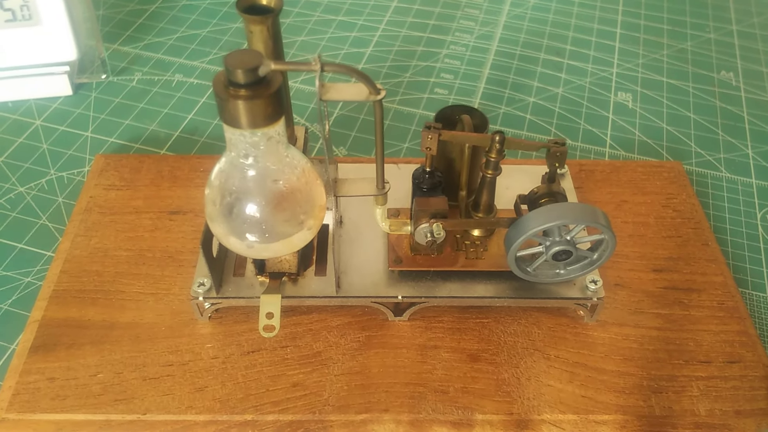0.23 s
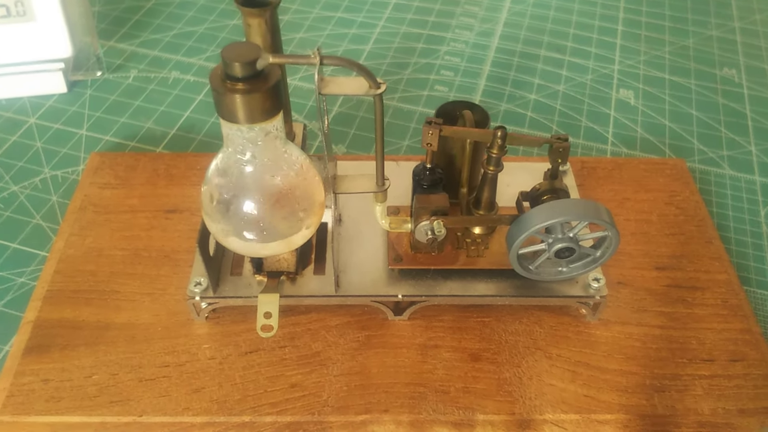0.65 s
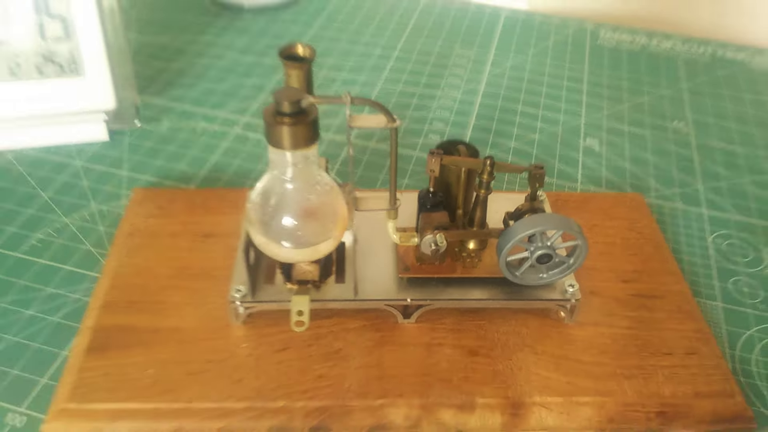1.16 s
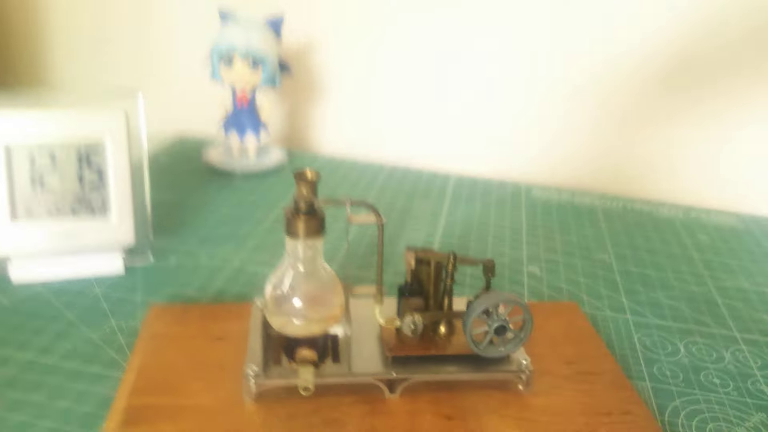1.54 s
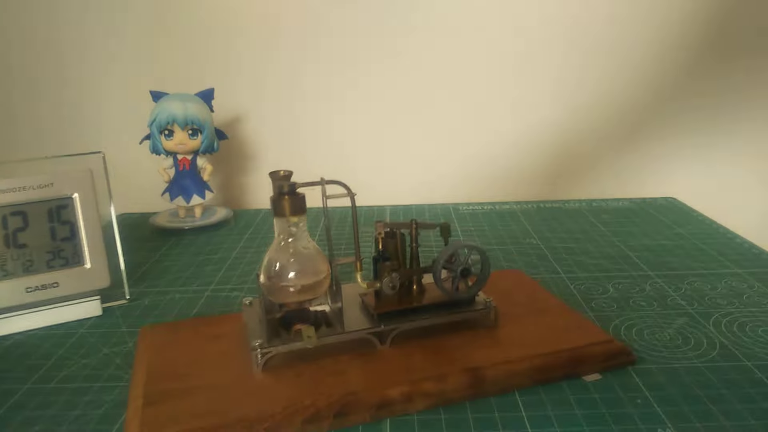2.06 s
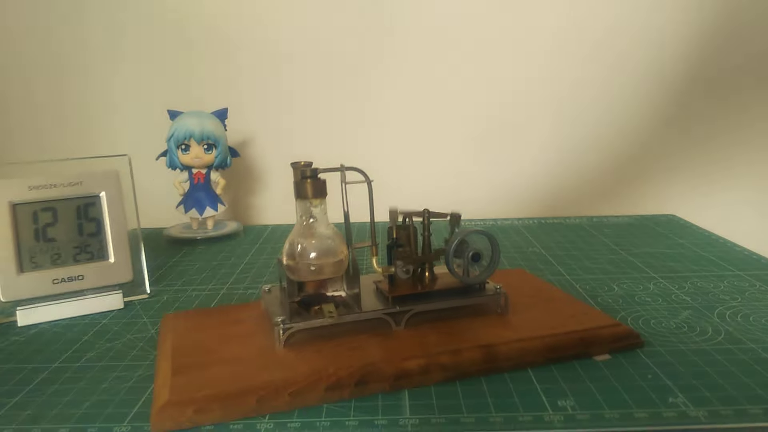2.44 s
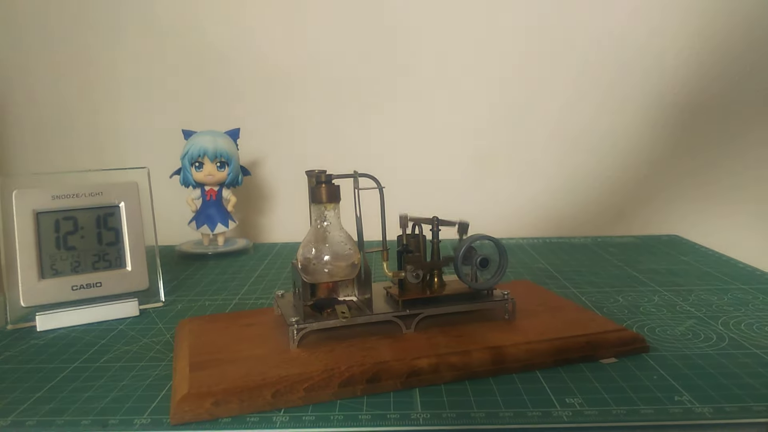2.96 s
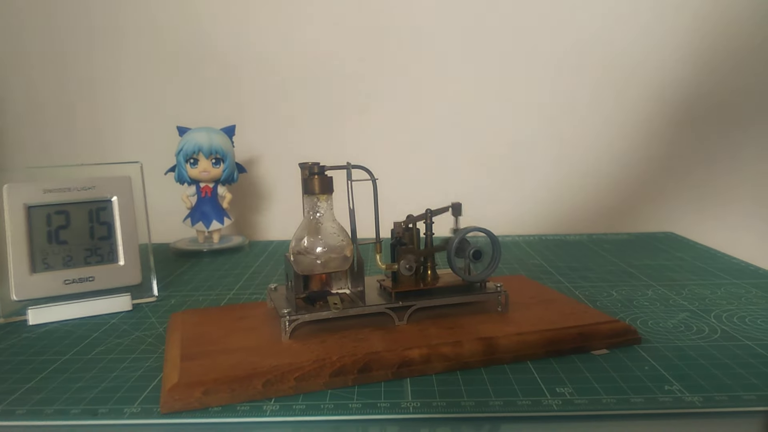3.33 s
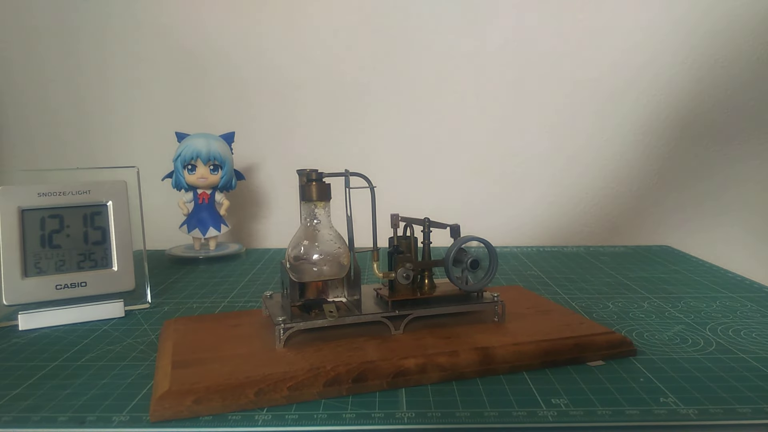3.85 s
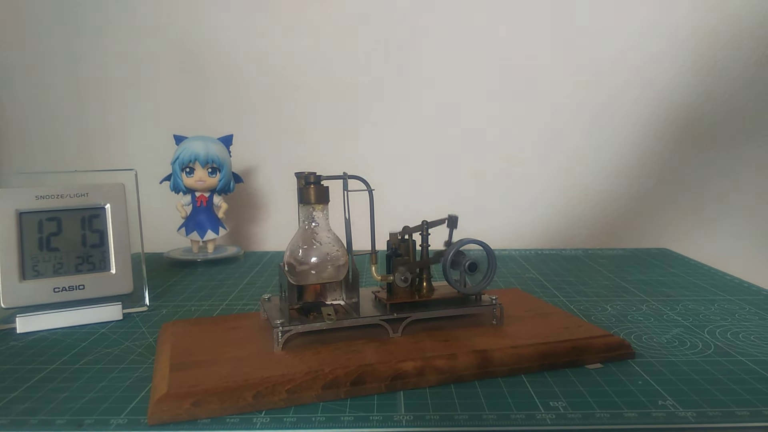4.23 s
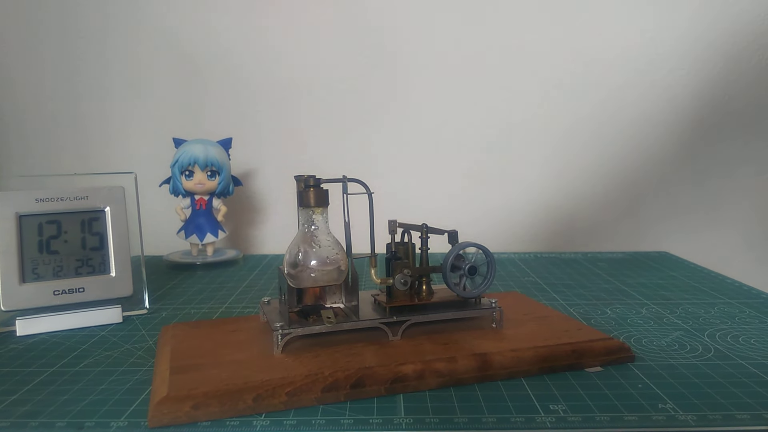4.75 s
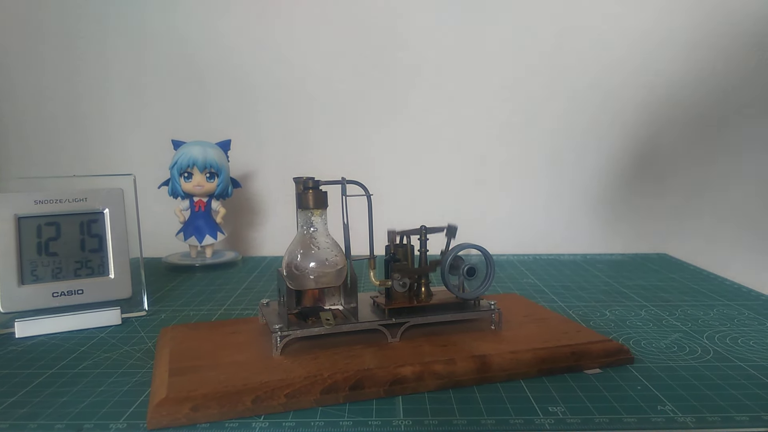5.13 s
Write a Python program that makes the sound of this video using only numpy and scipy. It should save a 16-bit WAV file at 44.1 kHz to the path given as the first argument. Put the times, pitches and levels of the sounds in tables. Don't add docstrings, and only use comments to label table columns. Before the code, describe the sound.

0-1.3 s: a quiet small room, only soft microphone hiss, low rumble and barely audible distant stirs, with one dry plastic click at 1.0 s. From 1.3 to 1.6 s, a cluster of faint creaks from the phone casing in the hand; from 1.67 to 2.1 s, harder snaps, the loudest at about 1.83 and 1.92 s. At 2.13 s a tiny steam engine starts close by, about seven or eight turns a second: sharp, bouncing metal ticks, gritty piston scrapes with a slight steamy hiss, and soft knocks into the wooden board. Loud rattles and rubbing mark 2.1-2.7 s, and metallic clanks peak around 3.1-3.3 s. From 3.4 to 4.0 s the ticking is softer and regular; sharper valve ticks return after 4.1 s, slowing slightly, with a longer gap near 4.8 s, continuing to the end around 5.4 s. Dry stereo, the right brighter in the upper mids, the left carrying finer treble.

```python
import sys
import numpy as np
from scipy import signal
from scipy.fft import rfft, irfft
from scipy.io import wavfile
from scipy.ndimage import uniform_filter1d

SR = 44100
rng = np.random.default_rng(int(sys.argv[2]) if len(sys.argv) > 2 else 0)


def wav_out(sig):
    wavfile.write(sys.argv[1], SR, np.round(np.clip(np.atleast_2d(sig).T, -1, 1) * 32767).astype(np.int16))


def attenuation_scalar(level_db):
    decades = np.asarray(level_db, float) / 20
    return 10 ** decades


N = 237566

VALVE, POWER, RETURN = range(1, 4)
# valve_snap_s, valve_db, power_stroke_db, return_stroke_db, piston_return_ms (after the valve)
FLYWHEEL_TURNS = [(2.1332, -19, -41.5, -42, 89), (2.248, -14, -44, -38, 101), (2.387, -19.5, -39, -39, 96),
                  (2.52, -17.5, -34.5, -41, 89), (2.6481, -18, -38.5, -41.5, 97.5),
                  (2.7858, -31, -37.5, -42.5, 91.4), (2.9142, -21.5, -40.5, -41, 101),
                  (3.059, -45, -35.5, -41.5, 92), (3.2, -45, -40, -38.5, 94.4), (3.335, -40, -39, -43, 101),
                  (3.486, -33, -37.5, -39, 100), (3.628, -49, -38, -41, 105), (3.781, -38, -38, -41, 98.5),
                  (3.935, -41, -38, -40.5, 102), (4.0774, -23.5, -37, -41, 103),
                  (4.2232, -22.5, -39.5, -40.5, 101.5), (4.3642, -19, -42.5, -41.5, 100),
                  (4.512, -33, -37, -45, 103.5), (4.676, -20.5, -40.5, -47.5, 99.5),
                  (4.9324, -19.5, -40, -45.5, 101), (5.1009, -19.5, -37.5, -44.5, 108.5),
                  (5.2677, -17.5, -39.5, -48.5, 100)]


def walk(rate_hz):
    hold = int(SR / rate_hz)
    steps = np.repeat(rng.standard_normal(N // hold + 1), hold)
    return uniform_filter1d(steps, hold // 2 + 1)[:N]


def ports(likeness):
    mid, side = rng.standard_normal((2, N))
    likeness = np.clip(likeness, 0, 1)
    opposed = side * np.array([[1], [-1]])
    return np.sqrt((1 + likeness) / 2) * mid + np.sqrt((1 - likeness) / 2) * opposed


def ring(hits, modes, rub=0, wander_db=3.2):
    out = np.zeros((2, N))
    for k, (hz, width_hz, left_db, right_db) in enumerate(modes):
        b, a = signal.iirpeak(hz, hz / (1.28 * width_hz), SR)
        share = attenuation_scalar(wander_db * walk(min(hz / 20, 130.)))
        band = signal.lfilter(b, a, signal.lfilter(b, a, hits + rub * share))
        out += (-1) ** k * band * attenuation_scalar(np.array([[left_db], [right_db]]))
    power = sum(width_hz * max(attenuation_scalar(left_db), attenuation_scalar(right_db)) ** 2 for _, width_hz, left_db, right_db in modes)
    return out / np.sqrt(power * np.pi / SR)


def blows(start_s, db, push_ms, chatter_ms, chatter):
    ms = np.arange(1024) / SR * 1000
    push = ms * np.exp(-ms / push_ms)
    push /= np.sqrt(np.sum(push ** 2))
    envelope = (1 - np.exp(-ms / push_ms)) * np.exp(-ms / chatter_ms)
    noise = rng.standard_normal((len(start_s), 2, len(ms))) * envelope
    noise /= np.sqrt(np.sum(noise ** 2, axis=2, keepdims=True))
    out = np.zeros((2, N + len(ms)))
    for i, gain, hiss in zip((start_s * SR).astype(int), attenuation_scalar(db), noise):
        out[:, i:i + len(ms)] += gain * (push + chatter * hiss) / np.hypot(1, chatter)
    return out[:, :N]


def grit(rate_hz, decay_ms, spread_db, steady):
    slips = (rng.random(N) < rate_hz / SR) * attenuation_scalar(spread_db * rng.exponential(size=N))
    fade = np.exp(-1000 / (decay_ms * SR))
    shape = steady + signal.lfilter([1], [1, -fade], slips)
    return shape / np.sqrt(uniform_filter1d(shape ** 2, size=2048))


def each_turn(part, way, over_db):
    turns = np.transpose(FLYWHEEL_TURNS)
    return turns[0] + way * turns[-1] / 1000, turns[part] + over_db


def slides():
    # part, way (share of the piston's return time), over_part_db, rise_ms, fall_ms_per_6db
    turn_slides = [
        (VALVE, 0.054, -18, 6.4, 41),
        (POWER, -0.019, -5.5, 5, 17),
        (POWER, 0.34, -0.47, 16, 13.7),
        (RETURN, 0.66, -1.8, 9.1, 14),
        (RETURN, 1.066, 0, 17.7, 23.4),
    ]
    # peak_s, level_db,
    # treble_share_db, rise_ms, fall_ms_per_6db
    extra_rubs = [(1.382, -52, -18, 8.1, 60), (1.45, -60, -16, 16, 5), (1.47, -56, -14, 14, 97),
                  (2.151, -31.5, -1, 12.4, 16), (2.191, -31.5, 2.5, 5.5, 6), (2.278, -23.5, 3, 6, 17),
                  (2.419, -27.5, -3.5, 13, 29), (3.162, -30, -27, 13, 19.5), (3.249, -28.5, -12, 14, 4.5),
                  (3.275, -32.5, -31, 8.2, 19), (3.396, -38, -6.5, 14, 20), (3.664, -32, -5.5, 5.1, 9),
                  (4.042, -33, -13, 6.1, 4.5), (4.73, -55.5, 4.5, 25, 31), (5.33, -41.5, -6.5, 24, 75)]
    rub_frame_db, valve_frame_db = -9, -14
    steam_db, steam_fade_db_per_s = -6, 1.5
    slowest_rise_ms = 18
    rows = []
    for part, way, over_db, rise, fall in turn_slides:
        frame_db = valve_frame_db if part == VALVE else rub_frame_db
        for s, db in zip(*each_turn(part, way, over_db)):
            treble_db = steam_db - steam_fade_db_per_s * (s - FLYWHEEL_TURNS[0][0])
            rows.append((s, db, frame_db, treble_db, min(rise, slowest_rise_ms), fall))
    return np.array(rows + [(s, db, rub_frame_db, *rest) for s, db, *rest in extra_rubs])


def stroke(db):
    power = np.zeros(N)
    ms = np.arange(N) / SR * 1000
    for (s, *_, rise, fall), peak_db in zip(slides(), db):
        near = slice(max(int((s - .2) * SR), 0), int((s + .2) * SR))
        late = ms[near] - s * 1000
        before = np.maximum(-late, 0) / max(rise, 1)
        after = np.maximum(late, 0) / max(fall, 1)
        power[near] += attenuation_scalar(peak_db - 3.55 * before ** 2 - 6.4 * after - 0.43 * after ** 2) ** 2
    return np.sqrt(power)


def floor():
    # freq_hz, left_db_per_hz, right_db_per_hz
    floor_levels = [(25, -110, -110), (51.7, -79.5, -80), (93, -90.5, -89.5), (900, -102, -102),
                    (4020, -105, -102.5), (5000, -106, -106), (11500, -114, -119), (14600, -123, -123)]
    # start_s, length_s, pitch_hz, level_db
    bumps = [
        (0.47, 0.077, 340, -64),
        (0.737, 0.49, 474, -68),
        (1.014, 0.017, 131, -52),
        (1.38, 0.13, 520, -64),
        (1.4, 0.17, 109, -63.5),
    ]
    hz, left, right = np.transpose(floor_levels)
    log_f = np.log(np.fft.rfftfreq(N, 1 / SR) + 1)
    levels_db = np.array([np.interp(log_f, np.log(hz), left), np.interp(log_f, np.log(hz), right)])
    colour = attenuation_scalar(levels_db) * np.sqrt(SR / 2)
    shared = np.clip(45 / np.exp(log_f) + .05, 0, 1)
    a, b = rfft(rng.standard_normal((2, N)))
    out = irfft(colour * np.array([a, shared * a + np.sqrt(1 - shared ** 2) * b]), N)
    t = np.arange(N) / SR
    for s, length_s, pitch_hz, db in bumps:
        swell = np.sin(np.pi * np.clip((t - s) / length_s, 0, 1)) * attenuation_scalar(db + 4.3 * walk(60.4))
        puff = signal.lfilter(*signal.iirpeak(pitch_hz, 3.0, SR), rng.standard_normal(N))
        out += swell * puff / np.std(puff) * 0.78
    return out


def case():
    # start_s, peak_db
    creaks = [(1.3219, -43), (1.3307, -33.5), (1.3375, -30.5), (1.3448, -31), (1.381, -36), (1.3965, -34.5),
              (1.408, -31.5), (1.4217, -36), (1.4365, -45), (1.4512, -35.5), (1.4682, -37), (1.4827, -40),
              (1.5212, -43.5), (1.5298, -40.5), (1.565, -46), (1.572, -43), (1.6055, -46)]
    # start_s, peak_db, body_share_db, treble_share_db
    snaps = [(1.0169, -15.5, -24.5, -33), (1.6676, -30.5, -7, -22.5), (1.699, -44, -3.5, -19),
             (1.742, -28, -7, -24), (1.774, -43, 3.5, -24), (1.796, -43, 1.5, -24), (1.813, -48.5, 5, -22),
             (1.825, -6.5, -22, -16.5), (1.8751, -16, -4, -14), (1.882, -41, -3, -20),
             (1.9185, -2.5, -20, -14.5), (1.9842, -40.5, -2.5, -19), (1.9987, -19, -10, -13),
             (2.0058, -25, -10.5, -20), (2.0642, -27, -29, -14), (2.0729, -23.5, -8, -9.5),
             (2.0899, -40, -1, -7), (2.1053, -42.5, -3, -11)]
    # freq_hz, width_hz, left_db, right_db
    case_port = [(2960, 1180, -17.5, 0.5), (3720, 590, -40, 6.5)]
    case_body = [(196, 560, -9, -1.5), (750, 330, -2, -1), (1660, 1350, -1, 2)]
    case_treble = [(5500, 2350, -8, 15.5), (10400, 2900, 3.5, -12)]
    creak_body_db, creak_treble_db = -13.5, -25
    clicks = snaps + [(*creak, creak_body_db, creak_treble_db) for creak in creaks]
    s, db, body_db, treble_db = np.transpose(clicks)
    port = ring(blows(s, db + 11.0, 0.033, 1.35, 0.98), case_port)
    body = ring(blows(s, db + body_db + 18, 0.09, 2.7, 3.4), case_body)
    treble = ring(blows(s, db + treble_db + 19.0, 0.02, 0.95, 1.2), case_treble)
    return port + body + treble


def knocks():
    turn_knocks = [
        (0, -52, 3.5, 0.1),
        (.29, -43.5, -6, 0.4),
        (0.608, -53, 9, 0),
        (1.0, -47.5, 8, 0.95),
    ]
    scatter_db = 1.
    rows = []
    for way, db, upper_db, follow in turn_knocks:
        for s, push_db in zip(*each_turn(RETURN, way, 39.65)):
            rows.append((s, db + follow * push_db, upper_db))
    scatter = scatter_db * rng.standard_normal((len(rows), 2))
    return np.array(rows) + np.pad(scatter, ((0, 0), (1, 0)))


def board():
    # freq_hz, width_hz, left_db, right_db
    board_low = [(55.4, 21, -9, -5), (102, 18.7, -1, -3.5), (182.3, 94, -1.5, -2)]
    board_high = [(291.7, 42, -2.5, 0.5), (461.3, 61.5, 4, -12), (584, 57, -4.5, -4),
                  (759.5, 118, -12, -5.5), (1034, 176, -12, -9)]
    s, db, upper_db = knocks().T
    shake = stroke(np.clip(slides()[:, 1], -60, -44))
    low = ring(blows(s, db + 14.5, 0.25, 2.8, 1.0), board_low, attenuation_scalar(-12.5) * shake * ports(0.9))
    high_hits = blows(s, db + upper_db + 24.0, 0.076, 8.9, 2.15)
    high = ring(high_hits, board_high, attenuation_scalar(-8.5) * shake * ports(0.6))
    return low + high


def clanks():
    # start_s, pitch_hz, peak_db, left_minus_right_db
    plate_knocks = [(2.7877, 694, -33.5, 6), (2.7874, 2000, -35, -16), (2.9125, 856, -23, -2.5),
                    (2.9127, 1730, -21, -5.5), (2.9764, 687, -41, 12), (3.0924, 631, -30, 6),
                    (3.0921, 1083, -30, 6), (3.2357, 900, -27, -1), (3.2727, 842, -33, 20),
                    (3.2727, 1675, -19, -6)]
    pin_hz, pin_over_return_db, pin_pan_db = 4600, 1.5, 0
    pin_clicks = [(s, pin_hz, db, pin_pan_db) for s, db in zip(*each_turn(RETURN, 1, pin_over_return_db))]
    t = np.arange(4096) / SR
    out = np.zeros((2, N + len(t)))
    for s, hz, db, pan_db in plate_knocks + pin_clicks:
        decay = attenuation_scalar(-60 * t * hz / 14) + 0.49 * attenuation_scalar(-60 * t * hz / 60)
        mode = np.sin(2 * np.pi * hz * t) * decay
        start = int(s * SR)
        out[:, start:start + len(t)] += mode * attenuation_scalar(db + np.array([[pan_db], [-pan_db]]) / 2)
    return signal.lfilter(*signal.butter(2, 380, "high", fs=SR), out[:, :N])


def ticks():
    # part, way (share of the piston's return time), over_part_db, frame_share_db, treble_share_db
    turn_ticks = [
        (VALVE, 0, 0, -26, -44.5),
        (POWER, 0.44, 2.3, -11, -56),
        (RETURN, .62, 2.9, -16, 5.2),
        (RETURN, 1.0, 2.7, -16.5, -12),
    ]
    # start_s, peak_db, frame_share_db, treble_share_db
    rattles = [(2.1465, -10, -17, -10.5), (2.1922, -22, -27, -18), (2.2226, -24, -14, -9),
               (2.2313, -17.5, -8.5, -3.5), (2.275, -11, -34, -6), (2.3825, -22.5, 0, -10),
               (2.4815, -39, -26, -14), (2.5383, -17, -11.5, -2.5), (2.668, -21, -29, -4.5),
               (2.9545, -36, -19, -12), (2.975, -32.5, 0, -16), (3.071, -37, -1, 3), (3.0919, -19, -1, -12),
               (3.1373, -31, -13, -20), (3.159, -18.5, -11, -16), (3.1635, -7.5, -14, -13.5),
               (3.2137, -38, 0, 3), (3.2225, -30, -4, 4), (3.2364, -33, -12, -14),
               (3.2449, -12, -12.5, -26), (3.2727, -8.5, -3.5, -21), (3.3906, -31.5, -28, -5),
               (3.502, -34, 4, -12), (3.6593, -27, -9.5, -20), (3.8, -20, -14, -11), (4.305, -39.5, 6, -14),
               (2.678, -23.5, -19, -20), (2.8, -32.5, 0.5, 3), (4.704, -31, -13, -20),
               (5.3133, -25, -29, -8)]
    bounce_ms, bounce_db, scatter_db = 10.2, -4, 2
    rows = []
    for part, way, over_db, frame_db, treble_db in turn_ticks:
        rows += [(s, db, frame_db, treble_db) for s, db in zip(*each_turn(part, way, over_db))]
    valve_snaps = rows[:len(FLYWHEEL_TURNS)]
    for k in (1, 2):
        rows += [(s + k * bounce_ms / 1000, db + k * k * bounce_db, *tone) for s, db, *tone in valve_snaps]
    scatter = scatter_db * rng.standard_normal((len(rows), 2))
    return np.vstack([np.array(rows) + np.pad(scatter, ((0, 0), (2, 0))), rattles])


def linkage():
    # freq_hz, width_hz, left_db, right_db
    port_modes = [(2830, 1470, -16.5, -9), (3400, 970, -8.5, 0), (3726, 550, -13, 6),
                  (4800, 1200, -19.5, -15)]
    frame_modes = [(701, 540, -8, -6), (997, 89, -5.5, -16.5), (1219, 237, -7, -4), (1580, 850, -9, -7.5),
                   (1914, 1230, -7.5, -4.5)]
    treble_modes = [(4970, 1980, 1, -9.5), (7000, 2120, 7, -1), (8750, 6000, -3.5, -110),
                    (11300, 1400, 8, -45)]
    s, db, frame_db, treble_db = ticks().T
    _, rub_db, rub_frame_db, rub_treble_db, *_ = slides().T
    slip = grit(280, 2.2, 2.6, .8)
    chatter = 1.6
    port_rub = slip * stroke(rub_db + .5) * ports(0.079)
    port = ring(blows(s, db + 14.5, 0.015, 2.3, chatter), port_modes, port_rub)
    frame_rub = slip * stroke(rub_db + rub_frame_db + 2.5) * ports(0.036)
    frame = ring(blows(s, db + frame_db + 16, 0.033, 5.3, chatter), frame_modes, frame_rub)
    puff = np.sqrt(slip)
    hiss_db = rub_db + rub_treble_db - 3.0
    treble_hits = blows(s, db + treble_db + 10, 0.019, 1.0, 7.5)
    lower = ring(treble_hits, treble_modes[:3], puff * stroke(hiss_db) * ports(0.1))
    top_db = hiss_db - .5 * np.maximum(hiss_db + 55.5, 0)
    top = ring(treble_hits * attenuation_scalar(0.5), treble_modes[3:], puff * stroke(top_db) * ports(0.12))
    return port + frame + lower + attenuation_scalar(-5.0) * top


def room(source):
    t60_s, level_db = .12, -17
    t = np.arange(8192) / SR
    tail = rng.standard_normal((2, len(t))) * attenuation_scalar(-60 * t / t60_s) * (t > .003)
    tail = signal.lfilter(*signal.butter(1, 300, "high", fs=SR), tail)
    tail *= attenuation_scalar(level_db) / np.sqrt(np.sum(tail ** 2, axis=1, keepdims=True))
    return signal.fftconvolve(source, tail, axes=1)[:, :N]


def scene():
    engine = linkage() + board() + clanks()
    hand = case()
    return engine + room(engine + attenuation_scalar(-14) * hand) + hand + floor()


def band_limit(x):
    return signal.sosfilt(signal.butter(12, 15110, fs=SR, output="sos"), x)


def record(dry):
    x = signal.sosfilt(signal.butter(2, 40, "high", fs=SR, output="sos"), dry)
    x = signal.sosfilt(signal.butter(12, 14100, fs=SR, output="sos"), np.tanh(x))
    return band_limit(x)


dry = scene()
out = record(dry)
wav_out(out)
```